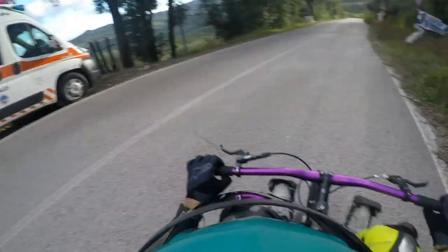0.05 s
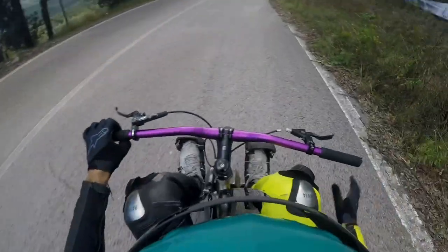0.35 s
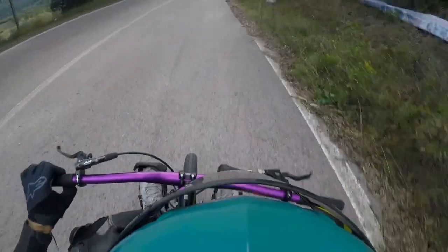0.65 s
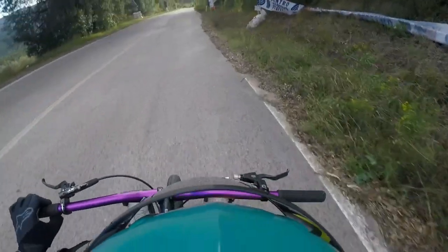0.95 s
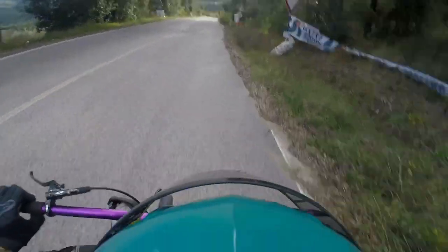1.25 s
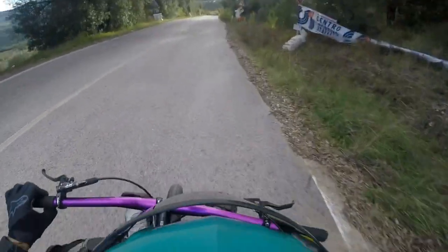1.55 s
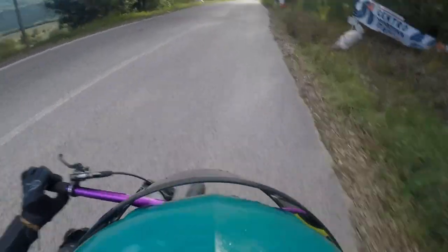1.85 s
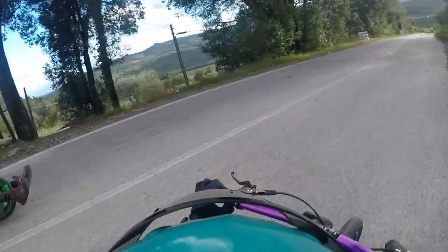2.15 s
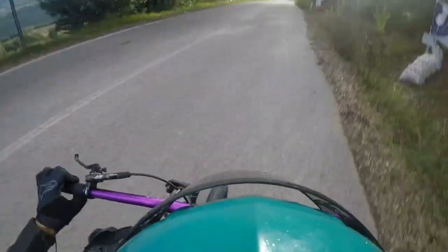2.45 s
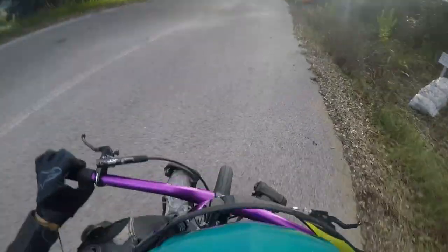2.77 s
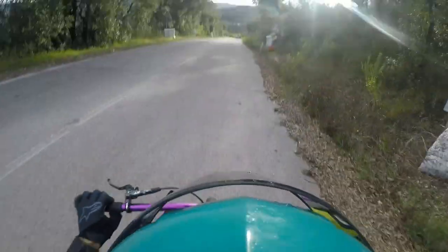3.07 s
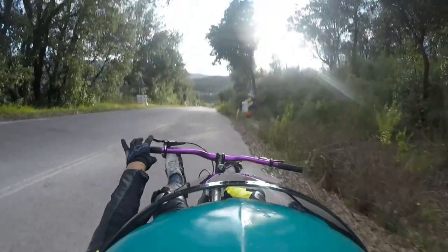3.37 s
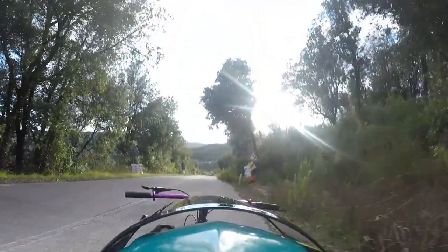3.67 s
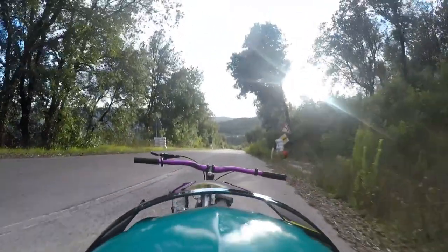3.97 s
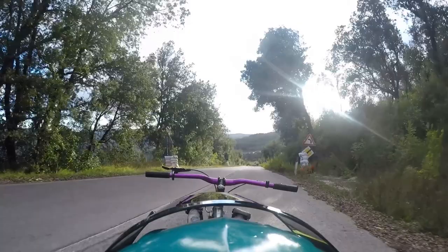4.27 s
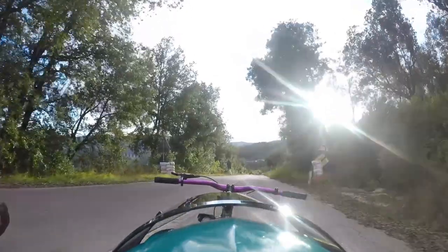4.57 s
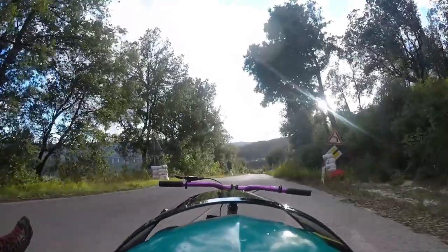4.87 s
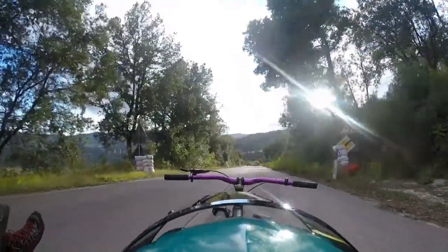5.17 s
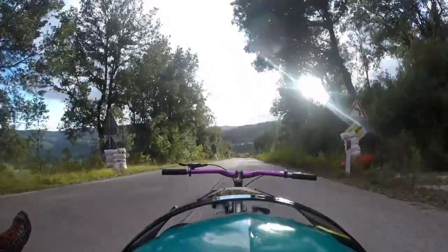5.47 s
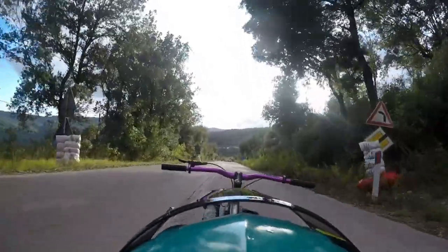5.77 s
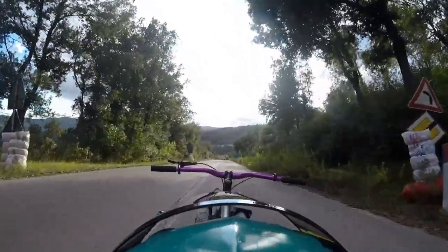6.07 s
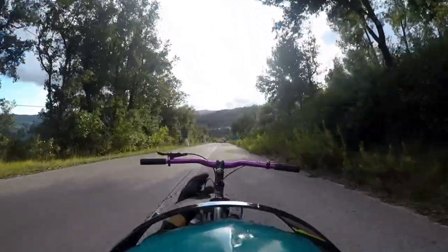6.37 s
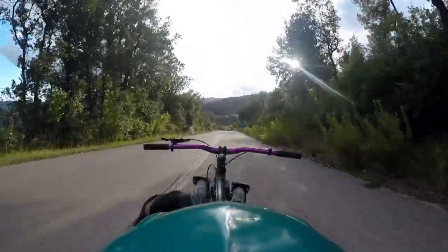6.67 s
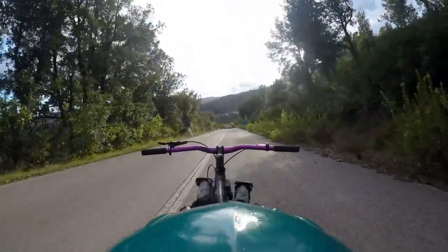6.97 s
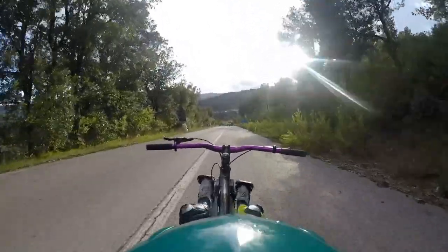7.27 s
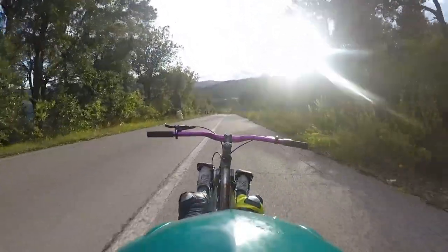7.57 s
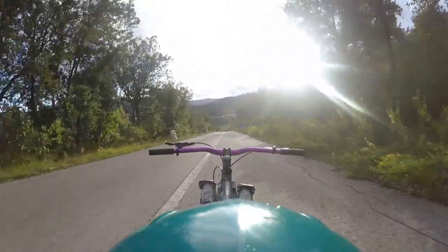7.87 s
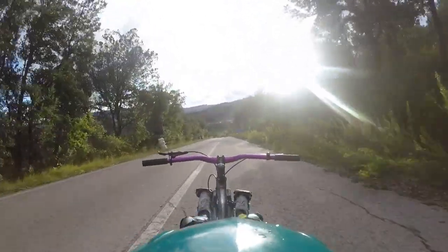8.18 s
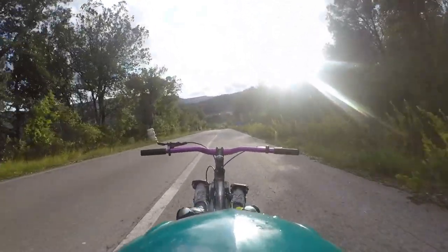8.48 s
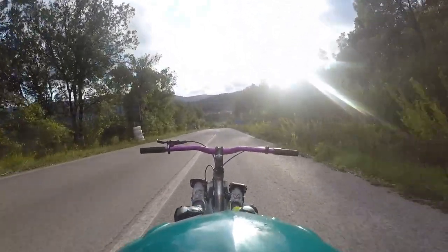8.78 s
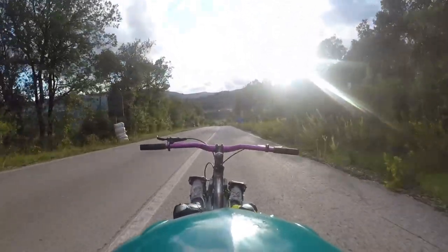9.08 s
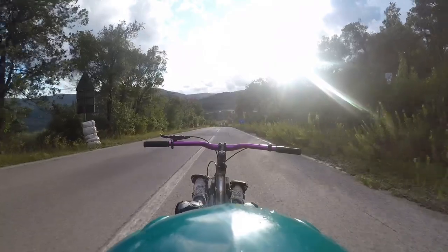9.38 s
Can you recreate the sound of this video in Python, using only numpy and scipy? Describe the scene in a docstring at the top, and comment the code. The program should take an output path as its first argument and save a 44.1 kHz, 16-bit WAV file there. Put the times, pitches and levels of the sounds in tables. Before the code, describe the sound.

Wind buffets a helmet microphone throughout as a bicycle coasts on asphalt. For the first three seconds the gusts are rough and irregular, slapping and crackling over low swells of pressure. Beneath them the wheels whirr hollowly and the tyres hiss, strongest around 2.1 to 2.6 seconds. Bumps knock on the helmet near 0.3, 1 and 1.25 seconds, and grit and cables tick here and there. At about 3.4 seconds the gusts ease and a deep, fluttering drone rises and stays, with a thin, faintly whistling air hiss until about 5 seconds. More knocks come near 5.2 and 5.8 seconds. Around 6.5 seconds a glove bumps and briefly rubs the helmet, followed by short, low, wavering hums of air until 7 seconds. The drone and rolling continue, with further puffs of wind from about 8.4 to 9.5 seconds.

```python
"""Gusts tear at a helmet microphone as a rider, lying head first on a bicycle, coasts down asphalt.
Eddies slap and crackle, slow swells press on the diaphragm, and air hisses over the helmet's edges.
The wheels whirr and the tyres hiss below; bumps knock on the shell, grit and cables tick.
Once the head is raised, vortices shed by the helmet settle into a deep, fluttering drone.
Later a gloved hand brushes the helmet and the air hums briefly in its wake."""
import sys
import numpy as np
from scipy import signal
from scipy.fft import next_fast_len
from scipy.io import wavfile
from scipy.ndimage import uniform_filter1d

SR = 44100
rng = np.random.default_rng(int(sys.argv[2]) if len(sys.argv) > 2 else 0)


def bounce(signal):
    """Save signal as a 16-bit WAV file at the path given by the first command-line argument."""
    frames = np.transpose(np.atleast_2d(signal))
    limited = np.clip(frames, -1, 1)
    pcm = np.round(limited * 32767).astype(np.int16)
    wavfile.write(sys.argv[1], SR, pcm)


N = 424683
TIME = np.arange(N) / SR


def from_db(db):
    return 10 ** (np.asarray(db) / 20)


def unit_rms(x):
    return x / np.sqrt(np.mean(x ** 2) + 1e-20)


def curves(rows):
    """One per-sample curve for each column after t/s."""
    times_s, *columns = np.transpose(rows)
    return [np.interp(TIME, times_s, column) for column in columns]


def db_at(spectrum, hz):
    """Spectrum level, interpolated over log frequency."""
    points_hz, points_db = np.transpose(spectrum)
    return np.interp(np.log(hz), np.log(points_hz), points_db)


def drift(rate_hz):
    """Smooth random wander, rms about 1."""
    step, settle = 10, 8000
    pole = np.exp(-2 * np.pi * rate_hz * step / SR)
    white = rng.standard_normal(N // step + settle + 2)
    slow = signal.lfilter([1], [1, -2 * pole, pole * pole], white)[settle:]
    return np.interp(np.arange(N) / step, np.arange(len(slow)), unit_rms(slow))


def analytic_noise(spectrum):
    """Complex noise, rolled off beyond the spectrum's ends; real part has rms 1."""
    size = next_fast_len(N)
    hz = np.maximum(np.arange(size // 2) * SR / size, 1)
    rolloff = np.minimum(hz / spectrum[0][0], 1) ** 2 * np.minimum(spectrum[-1][0] / hz, 1) ** 4
    bins = rng.standard_normal(len(hz)) + 1j * rng.standard_normal(len(hz))
    noise = np.fft.ifft(bins * rolloff * from_db(db_at(spectrum, hz)), size)[:N]
    return noise / noise.real.std()


def bandpass(x, low_hz, high_hz):
    sos = signal.butter(2, [low_hz, high_hz], "band", fs=SR, output="sos")
    return signal.sosfilt(sos, x + 1e-18)


def lowpass(x, edge_hz, order):
    return signal.sosfilt(signal.butter(order, edge_hz, fs=SR, output="sos"), x + 1e-18)


def narrow_noise(centre_hz, width_hz):
    """Noise band around a per-sample centre, rms 1."""
    i, q = lowpass(rng.standard_normal((2, N)), width_hz / 2, order=2)
    phase = 2 * np.pi * np.cumsum(centre_hz) / SR
    return unit_rms(i * np.cos(phase) + q * np.sin(phase))


def ring(force, hz, t60_s):
    """One damped mode; a unit impulse starts a unit sine."""
    pole = np.exp(-np.log(1000) / (t60_s * SR))
    angle = 2 * np.pi * hz / SR
    return signal.lfilter([0, np.sin(angle)], [1, -2 * pole * np.cos(angle), pole ** 2], force + 1e-18)


def driven_modes(modes, waver_db):
    """Noise-driven modes, each wavering in level."""
    return sum(from_db(db + waver_db * drift(9)) * unit_rms(ring(rng.standard_normal(N), hz, t60_s))
               for hz, db, t60_s in modes)


def hump(t_s, width_s):
    """Gaussian of height 1, centred on t_s."""
    out = np.zeros(N)
    span = slice(*np.searchsorted(TIME, [t_s - 3 * width_s, t_s + 3 * width_s]))
    out[span] = np.exp(-2 * ((TIME[span] - t_s) / width_s) ** 2)
    return out


def humps_db(rows):
    return sum(db * hump(t_s, width_s) for t_s, width_s, db in rows)


def bursts(rows, attack_db_per_s, release_db_per_s):
    """Attack-hold-release gain for rows of t/s, hold/s, level/dB."""
    out = np.zeros(N)
    for t_s, hold_s, db in rows:
        span = slice(max(int((t_s - .05) * SR), 0), int((t_s + .5) * SR))
        age_s = TIME[span] - t_s
        attack_db = attack_db_per_s * np.maximum(-age_s, 0)
        release_db = release_db_per_s * np.maximum(age_s - hold_s, 0)
        out[span] += from_db(db - attack_db - release_db)
    return out


# Turbulence at the microphone: t/s, level/dB, sharpness/dB (upper against low mids)
TURBULENCE = [(0, -22, -4.5), (1.2, -23, -6), (1.65, -17, -16), (2.03, -25, -5.5), (2.33, -14.5, -10),
              (2.7, -21.5, -5.5), (2.98, -26, -15), (3.45, -28.5, -4.5), (4.3, -28, -1),
              (4.45, -33.5, -5.5), (5.12, -28.5, -5), (5.5, -27, 1), (6.5, -24.5, -11.5), (6.95, -26, -19),
              (7.4, -26.5, -12), (8.5, -26.5, -7), (8.66, -32.5, -4), (9.1, -35.5, -4.5), (9.42, -31, 0.5)]
# Gusts and lulls: t/s, width/s, lift/dB
GUST_LIFTS = [(0.058, 0.027, -7.5), (0.201, .03, 2.5), (0.243, 0.011, 0.5), (0.316, 0.019, -8.5),
              (0.435, .02, -1.5), (0.544, 0.007, -2.5), (.629, 0.058, 7), (0.78, 0.016, -3.5),
              (0.91, 0.034, 3.5), (1.03, 0.021, 4), (1.159, .025, 6), (1.23, 0.017, -0.5),
              (1.341, 0.011, 7), (1.453, 0.023, 4), (1.615, 0.02, 2), (1.672, 0.016, -6.5),
              (1.794, 0.026, 3), (1.894, 0.054, 3), (1.958, .018, -10), (1.988, 0.027, 8.5),
              (2.06, .018, -6), (2.186, 0.036, -3), (2.42, 0.021, 4.5), (2.747, 0.12, 3),
              (2.852, .025, -6.5), (3.389, 0.028, 13.5), (3.474, 0.041, 7.5), (3.772, .03, -10.5),
              (4.75, 0.027, 10), (5.068, 0.086, -9.5), (5.272, 0.066, 4), (5.956, 0.044, 8.5),
              (6.15, 0.053, 3), (6.38, 0.027, -3.5), (6.489, 0.011, -8.5)]
def airflow(dulling_db_per_db=0.36):
    """Level and sharpness of the turbulence in dB; a gust makes it louder and deeper."""
    level_db, sharp_db = curves(TURBULENCE)
    lift_db = humps_db(GUST_LIFTS)
    return level_db + lift_db, sharp_db - dulling_db_per_db * lift_db


# Wind roar: f/Hz, density/dB
GUST_SPECTRUM = [(70, -18), (120, 7), (180, 1.5), (270, 1.5), (400, -4.5), (700, -13.5), (1300, -19.5),
                 (2000, -37), (3000, -48), (4500, -66), (8000, -79)]
def gusts(gain_db=2.0, pivot_hz=290, tilt_per_octave=0.92):
    """Turbulence roars in half-octave bands; eddies lift them together, sharpness tilts them."""
    flow_db, sharp_db = airflow()
    eddies_db = 1.65 * drift(16) + 0.33 * drift(130)
    white = rng.standard_normal((2, N))
    edges_hz = 80 * 2 ** (np.arange(14) / 2)
    roar, power = 0, 0
    for k, (low_hz, high_hz) in enumerate(zip(edges_hz, edges_hz[1:])):
        centre_hz = np.sqrt(low_hz * high_hz)
        band = bandpass(white[k % 2], low_hz, high_hz) * from_db(db_at(GUST_SPECTRUM, centre_hz))
        tilt = np.clip(tilt_per_octave * np.log2(centre_hz / pivot_hz), 0, 0.84)
        flutter_db = 2.0 * drift(17.6)
        roar += band * from_db(tilt * (sharp_db - sharp_db.mean()) + flutter_db)
        power += band.var()
    return lowpass(roar / np.sqrt(power) * from_db(gain_db + flow_db + eddies_db), 5500, order=4)


def crackle(gain_db=-7.0, pops_per_s=550, full_force_db=-22, steepness=3.04, t60_s=0.0045):
    """Strong, sharp gusts tear into tiny pops that fade quickly as the air calms."""
    flow_db, sharp_db = airflow()
    force_db = full_force_db + steepness * np.minimum(flow_db + sharp_db - full_force_db, 0)
    onsets = rng.random(N) < pops_per_s / SR
    pole = np.exp(-np.log(1000) / (t60_s * SR))
    pops = signal.lfilter([1], [1, -pole], onsets + 1e-18) * rng.standard_normal(N)
    pops = lowpass(bandpass(pops, 1150, 2500), 7200, order=3)
    return from_db(gain_db + force_db) * unit_rms(pops)


def vortices(spectrum, steadiness):
    """Vortex shedding limits its own swing: phase wanders more freely than strength."""
    noise = analytic_noise(spectrum)
    return unit_rms(noise.real / (np.abs(noise) ** 2 + 0.46) ** (steadiness / 2))


# Large slow eddies: t/s, width/s, level/dB
PRESSURE_SWELLS = [(.56, 0.17, -19.5), (1.295, 0.08, -11.5), (1.7, 0.17, -13), (1.97, 0.1, -15.5),
                   (2.28, 0.31, -19.5), (2.79, 0.18, -17), (3.19, 0.14, -17.5), (3.43, 0.2, -19.5),
                   (4.12, 0.053, -14.5), (4.48, 0.024, -15), (6.66, 0.19, -18), (8.15, 0.8, -23),
                   (8.5, 0.079, -26)]
def swell_pressure():
    """Envelope of the large eddies' push on the diaphragm."""
    return sum(from_db(db) * hump(t_s, width_s) for t_s, width_s, db in PRESSURE_SWELLS)


def swell_ducking(half_gain_at_db=-13, steepness=6.7):
    """Gain for gusts, crackle and tyre hiss: it dips briefly under each strong low swell."""
    return 1 / (1 + (swell_pressure() / from_db(half_gain_at_db)) ** steepness)


# Slow pressure on the diaphragm: f/Hz, density/dB
BUFFET_SPECTRUM = [(5, -18), (14, -7), (24, 0), (32, 0), (42, -6), (55, -11), (80, -24), (200, -55)]
def buffet(gain_db=2.0, floor_db=-27.5):
    """Slow pressure rumbles on the diaphragm and rises with each swell."""
    pressure = np.hypot(from_db(floor_db), swell_pressure())
    return from_db(gain_db) * pressure * vortices(BUFFET_SPECTRUM, steadiness=.7)


# Air over the helmet's edges: t/s, level/dB
STREAM_LEVELS = [(0, -50.5), (.2, -49.5), (.32, -62), (1.5, -64), (1.7, -70), (1.9, -63), (2.45, -78),
                 (2.9, -63.5), (3.45, -49), (3.95, -44.5), (4.5, -51), (5.12, -51.5), (5.33, -63),
                 (5.58, -55.5), (5.9, -64.5), (7.2, -66.5), (7.35, -60), (7.6, -63), (8.5, -56.5),
                 (9.1, -69)]
# Its hiss: f/Hz, density/dB
STREAM_SPECTRUM = [(3500, 9.5), (5500, 2), (6200, -4.5), (7000, -0.5), (7600, -4), (9000, -6), (9950, -8),
                   (10700, -14), (11500, -19.5), (13000, -24), (15000, -41.5)]
# Edge and vent whistles: f/Hz, level/dB, t60/s
WHISTLE_MODES = [(4400, 10, 0.022), (6432, 2, .05), (6940, -2, .012), (8160, -5, .012), (9800, -7.5, .025)]
def airstream(flutter_db=3.0, whistle_gain_db=-46.0):
    """Air hisses thinly over the helmet's edges; faint whistles come and go."""
    stream_db, = curves(STREAM_LEVELS)
    hiss = from_db(stream_db + flutter_db * drift(31)) * analytic_noise(STREAM_SPECTRUM).real
    whistles = lowpass(driven_modes(WHISTLE_MODES, waver_db=3), 10500, order=6)
    return hiss + from_db(whistle_gain_db + stream_db / 2) * whistles


# Rolling on asphalt: t/s, tyre level/dB, wheel level/dB
ROLLING_LEVELS = [(0, -62, -48), (.8, -56, -44), (1.3, -46, -48.5), (1.52, -46, -51), (1.7, -45.5, -53),
                  (2.05, -44.5, -48), (2.12, -35, -53), (2.55, -39, -52), (2.87, -61, -51),
                  (2.98, -62, -45), (3.07, -61, -40.5), (3.25, -44.5, -39.5), (3.6, -44, -40),
                  (3.95, -40, -42.5), (4.35, -49, -41.5), (4.7, -44, -48), (5.08, -46.5, -47.5),
                  (5.5, -45.5, -48), (6.45, -40.5, -48.5), (6.73, -51.5, -54.5), (7.0, -49.5, -47.5),
                  (7.3, -43.5, -47), (8.1, -42, -42.5), (8.85, -44.5, -45.5), (8.97, -48.5, -44.5),
                  (9.63, -42, -42.5)]
# Wheel resonances: f/Hz, level/dB, t60/s
WHEEL_MODES = [(1386, 2.5, 0.025), (1930, -2.5, .018), (2330, -2, 0.02), (2520, -3.5, 0.011),
               (3148, -3.5, 0.022), (3468, 1, 0.013), (3860, -6, 0.035), (4540, -10.5, 0.01)]
def wheels():
    """The road keeps the wheels ringing in a hollow whirr."""
    _, wheel_db = curves(ROLLING_LEVELS)
    whirr = lowpass(driven_modes(WHEEL_MODES, waver_db=2.6), 5700, order=4)
    return from_db(wheel_db) * unit_rms(whirr)


# Tread hiss: f/Hz, density/dB
TYRE_SPECTRUM = [(200, 0), (600, 14.5), (1000, 7.5), (1380, 9.5), (1900, 3.5), (2400, -1.5), (2950, -2.5),
                 (3600, -5.5), (4100, -12), (4700, -14.5), (5700, -29), (8000, -41)]
def tyres(gain_db=9.0, grain_db=2.2):
    """Tread on coarse asphalt hisses in fine grains."""
    tyre_db, _ = curves(ROLLING_LEVELS)
    return from_db(gain_db + tyre_db + grain_db * drift(32)) * analytic_noise(TYRE_SPECTRUM).real


# Single eddies: t/s, rise/s, fall/s, upper edge/Hz, level/dB
EDDY_PUFFS = [(0.013, 0.016, 0.023, 990, -22.5), (.124, 0.037, 0.032, 1510, -27.5),
              (.274, 0.0058, 0.033, 1000, -21), (.358, 0.005, 0.0081, 450, -31),
              (.388, 0.033, 0.024, 1190, -28.5), (.478, 0.018, 0.027, 1080, -21.5),
              (.525, 0.031, 0.013, 1290, -24.5), (0.551, 0.0034, 0.047, 1030, -24),
              (.632, 0.037, 0.068, 1220, -26), (.754, .003, 0.0085, 1230, -24),
              (0.991, .015, 0.019, 700, -29), (1.248, 0.0062, 0.014, 325, -7),
              (1.555, 0.12, 0.012, 2380, -30.5), (1.58, 0.027, 0.016, 1130, -19),
              (1.638, 0.033, 0.011, 825, -21.5), (1.696, 0.0042, 0.027, 300, -10),
              (1.872, 0.0048, 0.019, 890, -30), (2.074, .002, 0.026, 1990, -24.5),
              (2.129, 0.039, 0.022, 290, -11), (2.15, 0.065, 0.058, 2220, -34.5),
              (2.25, 0.043, 0.028, 3240, -38.5), (2.298, 0.019, 0.038, 1310, -17.5),
              (2.54, 0.19, 0.16, 2190, -32.5), (2.745, 0.027, 0.022, 1520, -29),
              (2.802, 0.039, 0.015, 890, -20.5), (2.884, 0.0062, 0.015, 318, -12.5),
              (2.921, 0.014, 0.021, 720, -23.5), (4.197, 0.032, 0.041, 1330, -22.5),
              (4.358, .015, .015, 1170, -24.5), (5.932, .003, 0.013, 970, -23.5),
              (6.409, 0.0043, 0.012, 830, -21), (6.433, .003, 0.0072, 1850, -22.5),
              (6.437, 0.025, 0.023, 313, -10.5), (6.461, .008, 0.014, 600, -25),
              (6.665, 0.12, 0.069, 447, -22.5), (7.57, .04, 0.036, 850, -32),
              (8.364, 0.023, 0.011, 590, -26), (8.535, 0.06, 0.069, 900, -26),
              (8.806, .01, 0.018, 850, -23.5), (8.835, .003, 0.01, 1800, -31),
              (8.88, 0.039, 0.028, 1600, -32.5), (9.336, 0.0045, 0.0086, 1110, -25),
              (9.392, 0.0029, 0.013, 900, -27), (9.435, 0.021, 0.025, 610, -22.5)]
def puffs(ragged_db=2.0, skirt_db=-7.0):
    """An eddy slaps the microphone; its size sets a steep upper edge, finer eddies add a skirt."""
    out = np.zeros(N)
    coarse, fine = from_db(ragged_db * drift(220)) * rng.standard_normal((2, N))
    for t_s, rise_s, fall_s, edge_hz, db in EDDY_PUFFS:
        span = np.flatnonzero((TIME > t_s - 2 * rise_s) & (TIME < t_s + 2 * fall_s))
        age_s = TIME[span] - t_s
        envelope = np.exp(-2 * (age_s / np.where(age_s < 0, rise_s, fall_s)) ** 2)
        steep_band = signal.cheby1(3, 1, [edge_hz / 4, edge_hz], "band", fs=SR, output="sos")
        body = signal.sosfilt(steep_band, coarse[span])
        skirt = from_db(skirt_db) * bandpass(fine[span], edge_hz / 6, 1.15 * edge_hz)
        puff = unit_rms((body + skirt) * envelope)
        out[span] += from_db(db) * puff * np.sqrt(np.mean(envelope ** 2))
    return out


# Tears in the airflow: t/s, hold/s, level/dB
AIR_CRACKS = [(.274, 0.0061, -31.5), (.531, 0.0046, -34), (.597, .003, -33), (.612, .003, -23),
              (.630, .003, -31), (.931, 0.0029, -25.5), (.970, 0.0054, -20), (.987, 0.003, -24),
              (1.034, 0.015, -29.5), (1.246, .001, -26), (1.528, 0.0054, -23), (1.550, 0.0051, -18),
              (1.563, 0.0055, -26), (1.576, .005, -28), (1.797, .002, -26), (1.807, .002, -26),
              (1.836, 0.003, -25), (2.275, 0.0086, -22), (2.409, 0.0045, -25), (2.616, 0.0037, -25),
              (6.457, .008, -28)]
# Their noise: f/Hz, density/dB
CRACK_SPECTRUM = [(450, 13), (1100, 2), (2500, -0.5), (3600, -9), (5500, -33.5), (9000, -56.5)]
def cracks(gain_db=1.0, ragged_db=2.0):
    """The airflow tears in short, ragged rips from low mids to treble."""
    envelope = bursts(AIR_CRACKS, attack_db_per_s=12006, release_db_per_s=1499)
    return envelope * from_db(gain_db + ragged_db * drift(600)) * analytic_noise(CRACK_SPECTRUM).real


# Blows on the helmet: t/s, level/dB, hardness as upper edge/Hz
BLOWS = [(.277, -7, 1600), (.990, -8, 2600), (1.2465, -2, 2400), (1.251, -5, 2200), (1.691, -17, 2000),
         (5.235, -6, 1100), (5.793, -11, 1200), (6.433, -14, 1800), (6.460, -10, 1100), (7.171, -19, 1200)]
# Shell and camera mount: f/Hz, level/dB, t60/s
SHELL_MODES = [(233, 9.5, 0.02), (605, -0.5, 0.016), (750, 0.5, 0.024), (925, -5, 0.023),
               (1430, -11.5, .025), (1540, -9, 0.013), (1693, -6, 0.029), (1850, -17, .04)]
def knocks():
    """Bumps strike the shell's modes; a softer blow leaves the upper ones quiet."""
    shell = np.zeros(N)
    for hz, mode_db, t60_s in SHELL_MODES:
        force = np.zeros(N)
        for t_s, blow_db, edge_hz in BLOWS:
            softness_db = 10 * np.log10(1 + (hz / edge_hz) ** 8)
            force[int(t_s * SR)] += from_db(blow_db + rng.normal() - softness_db)
        shell += from_db(mode_db) * ring(force, hz, t60_s)
    return lowpass(shell, 2200, order=7) / np.sqrt(len(SHELL_MODES))


# Grit and cable ticks: t/s, level/dB, f/Hz
GEAR_TICKS = [(1.349, -30, 3200), (1.551, -20, 4000), (1.797, -19, 2400), (1.807, -24, 2700),
              (1.838, -12, 2200), (2.370, -19, 3100), (2.390, -22, 3000), (2.412, -22, 3500),
              (2.422, -22, 3400), (2.453, -18, 3000), (2.555, -23, 3500), (2.596, -25, 3400),
              (2.608, -25, 3600), (3.716, -25, 4400), (3.832, -27, 4400), (4.092, -29, 5000),
              (4.446, -24, 3000), (4.532, -24, 3000), (5.12, -31, 4800), (5.378, -21, 3300),
              (6.411, -31, 3300), (6.461, -17, 2200), (6.508, -23, 3300), (6.562, -23, 2800),
              (6.631, -34, 4200), (6.776, -38, 5600), (7.301, -35, 5600), (7.381, -40, 5600),
              (7.407, -39, 5600)]
def ticks(gain_db=-4.0, t60_s=.018, grit_count=10, grit_db=(-42, -34), grit_hz=(2800, 4200)):
    """Grit and cables tick dryly, each at its own pitch; fainter grit flies up at random."""
    out = np.zeros(N)
    age_s = TIME[:SR // 20]
    latest_s = TIME[-len(age_s) - 1]
    grit = [(rng.uniform(0, latest_s), rng.uniform(*grit_db), rng.uniform(*grit_hz))
            for _ in range(grit_count)]
    for t_s, db, hz in GEAR_TICKS + grit:
        burst = rng.standard_normal(len(age_s)) * from_db(-60 * age_s / t60_s)
        tick = lowpass(bandpass(burst, hz / 1.5, hz * 1.5), 1.6 * hz, order=3)
        start = int(t_s * SR)
        out[start:start + len(tick)] += from_db(gain_db + db) * tick / np.abs(tick).max()
    return out


# Big departing eddies: t/s, width/s, f/Hz, level/dB
EDDY_WHOOSHES = [(1.613, .035, 800, -26), (2.797, .04, 980, -25.5), (6.665, .06, 520, -28)]
def whooshes(width_hz=200, sag_octaves_per_s=7):
    """A passing eddy rings in one hollow band that sinks as it moves away."""
    out = np.zeros(N)
    for t_s, width_s, hz, db in EDDY_WHOOSHES:
        sag = 2 ** (-sag_octaves_per_s * np.clip(TIME - t_s, -2 * width_s, 2 * width_s))
        out += from_db(db) * hump(t_s, width_s) * narrow_noise(hz * sag, width_hz)
    return out


# Helmet wake: f/Hz, density/dB
DRONE_SPECTRUM = [(30, -26), (48, -13), (63, -5), (82, 0), (92, -1.5), (108, -10.5), (135, -20), (260, -45)]
# Brief rises in the drone's level: t/s, width/s, lift/dB
DRONE_SURGES = [(4.35, 0.042, 2), (4.62, 0.061, 1), (4.94, 0.066, 5)]
# Brief dips in the drone's level: t/s, width/s, depth/dB
DRONE_DIPS = [(3.048, 0.058, 19), (3.802, 0.035, 11), (4.053, 0.03, 7), (4.672, 0.015, 17),
              (4.976, 0.012, 24), (6.495, 0.014, 3), (6.625, 0.08, 11), (6.84, 0.12, 6.5),
              (7.077, 0.16, 5.5), (7.497, 0.025, 8), (7.707, 0.1, 3), (8.394, 0.034, 26), (9.478, 0.02, 17)]
def helmet_drone(gain_db=0.27, head_down_db=-26, head_up_db=-13, raised_at_s=3.43, raising_s=0.088):
    """The helmet sheds vortices in a fluttering drone that steps up as the head is raised."""
    raised = (1 + np.tanh((TIME - raised_at_s) / raising_s)) / 2
    posture_db = head_down_db + (head_up_db - head_down_db) * raised
    drone_db = posture_db + humps_db(DRONE_SURGES) - humps_db(DRONE_DIPS)
    return from_db(gain_db + drone_db) * vortices(DRONE_SPECTRUM, steadiness=.45)


# Glove on helmet: t/s, hold/s, level/dB
GLOVE_STROKES = [(6.456, 0.0074, -33), (6.506, 0.1, -29), (6.508, 0.0088, -21.5), (6.556, 0.016, -20.5)]
# Resonances of the hollow between them: f/Hz, level/dB, width/Hz
HOLLOW_MODES = [(494, 2.5, 330), (730, 0.5, 69), (880, -2.5, 140), (1130, -9, 110), (1406, -1, 130),
                (1847, -5, 190), (2010, -5.5, 100), (2280, -11.5, 140)]
def glove(slip_db=2.5, scratch_db=-25, hollow_forms_s=6.507, sag_octaves_per_s=0.4):
    """The glove scratches in small slips; the hollow under it sinks in pitch as the hand leaves."""
    sag = 2 ** (-sag_octaves_per_s * np.clip(TIME - hollow_forms_s, 0, .5))
    hollow = sum(from_db(db) * narrow_noise(hz * sag, width_hz) for hz, db, width_hz in HOLLOW_MODES)
    scratch = lowpass(bandpass(rng.standard_normal(N), 2500, 5200), 5200, order=5)
    rub = unit_rms(hollow) + from_db(scratch_db) * unit_rms(scratch)
    envelope = bursts(GLOVE_STROKES, attack_db_per_s=7007, release_db_per_s=290)
    return envelope * from_db(slip_db * drift(250)) * rub


# Hums behind the hand: t/s, width/s, f/Hz, level/dB
HAND_HUMS = [(6.744, 0.057, 628, -33.5), (6.786, 0.014, 277, -23.5), (6.858, 0.014, 266, -12.5),
             (6.927, 0.048, 262, -15.5), (6.994, 0.028, 280, -20)]
def hand_wake(pitch_waver=0.0417):
    """Air sings behind the hand in brief, wavering hums."""
    out = np.zeros(N)
    for t_s, width_s, hz, db in HAND_HUMS:
        phase = 2 * np.pi * np.cumsum(hz * (1 + pitch_waver * drift(41))) / SR
        out += from_db(db) * hump(t_s, width_s) * unit_rms(np.sin(phase))
    return out


def scene():
    """Mono mix; gusts, crackle and tyre hiss dip under the strongest swells."""
    ducked = swell_ducking() * (gusts() + crackle() + tyres())
    air = buffet() + airstream() + puffs() + cracks() + whooshes() + helmet_drone()
    gear = wheels() + knocks() + ticks()
    hand = glove() + hand_wake()
    return (ducked + air + gear + hand)[None]


def record(dry, threshold_db=-2.5, release_db_per_s=160, attack_s=.003, cutoff_hz=15300):
    """A look-ahead limiter ducks the strongest swings; a steep low-pass cuts the top."""
    over_db = np.maximum(20 * np.log10(np.abs(dry[0]) + 1e-9) - threshold_db, 0)
    release_db = release_db_per_s * TIME
    held_db = np.maximum.accumulate(over_db + release_db) - release_db
    window = int(attack_s * SR)
    smooth_db = uniform_filter1d(uniform_filter1d(held_db, window), window)
    duck_db = np.interp(TIME + attack_s / 2, TIME, smooth_db)
    top_cut = signal.cheby2(12, 70, cutoff_hz, fs=SR, output="sos")
    return signal.sosfilt(top_cut, dry * from_db(-duck_db))


dry = scene()
out = record(dry)
bounce(out)
```